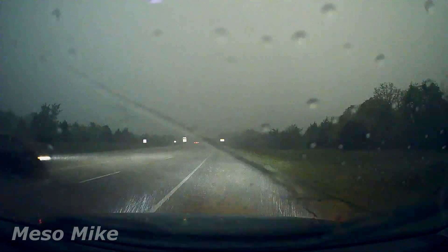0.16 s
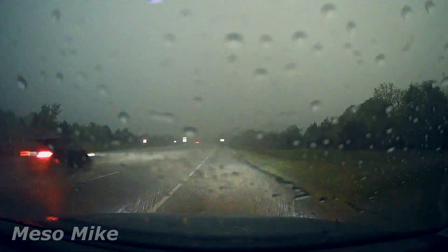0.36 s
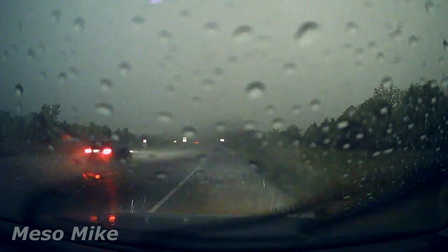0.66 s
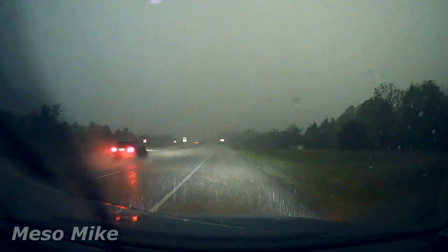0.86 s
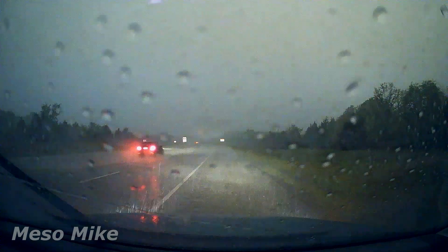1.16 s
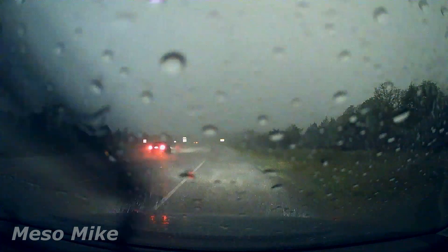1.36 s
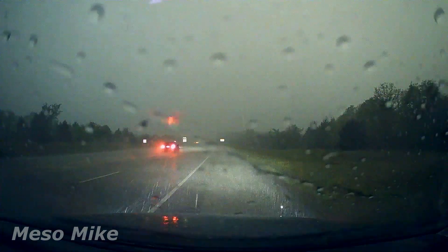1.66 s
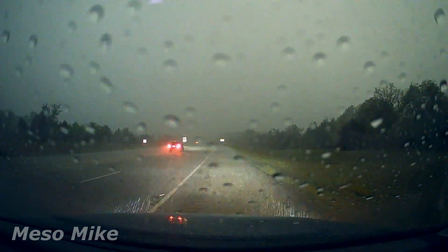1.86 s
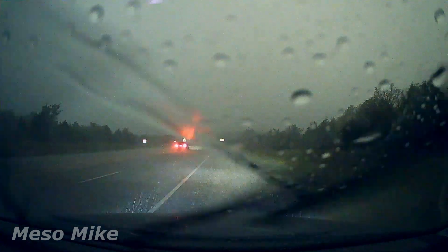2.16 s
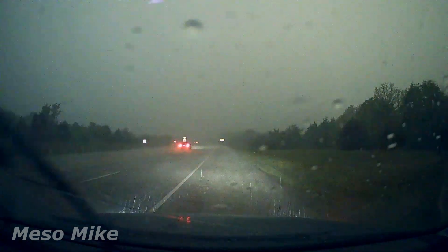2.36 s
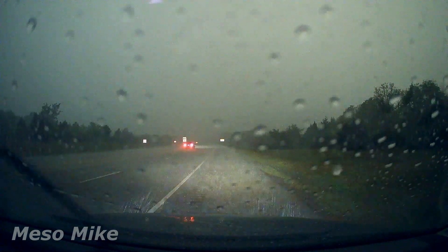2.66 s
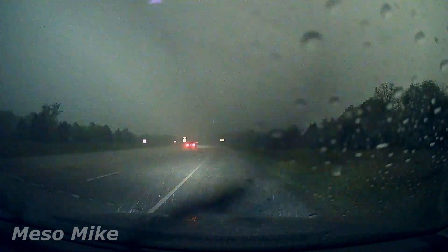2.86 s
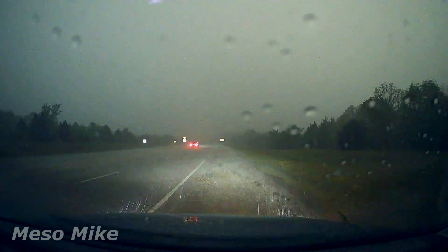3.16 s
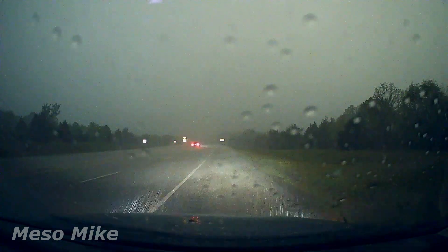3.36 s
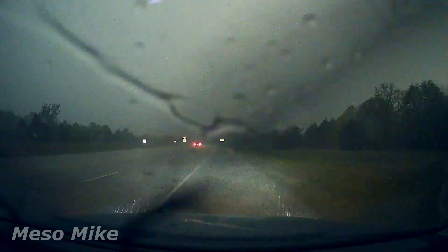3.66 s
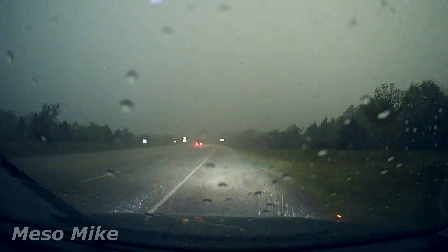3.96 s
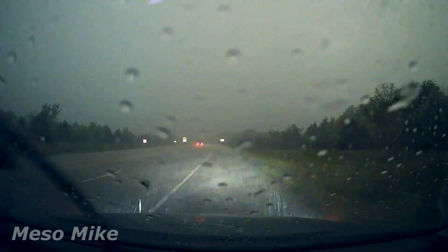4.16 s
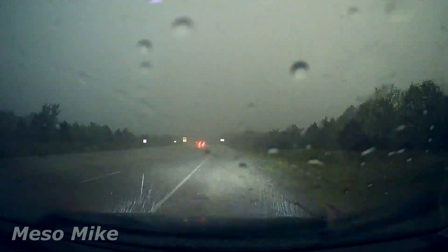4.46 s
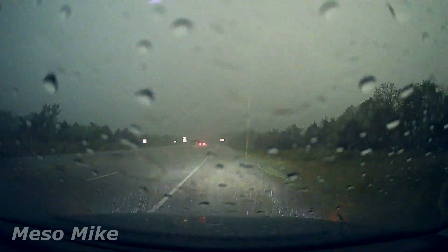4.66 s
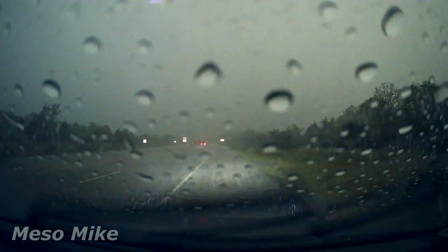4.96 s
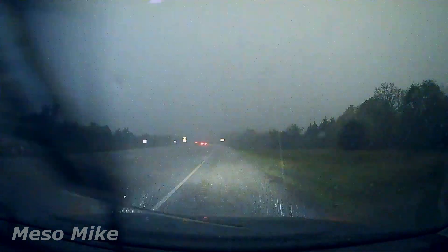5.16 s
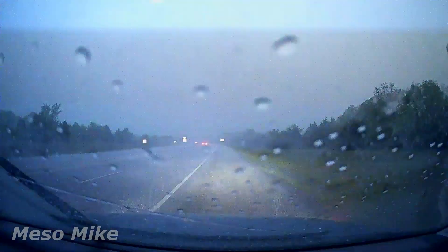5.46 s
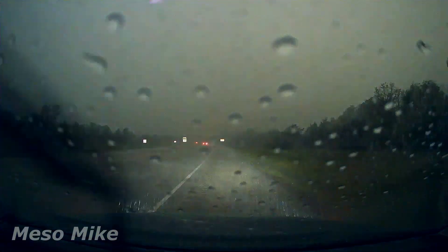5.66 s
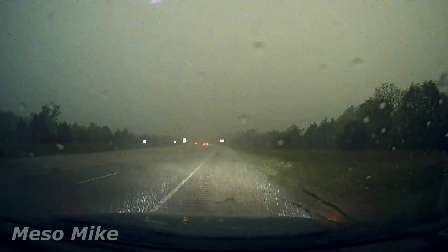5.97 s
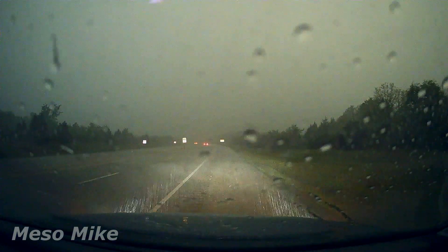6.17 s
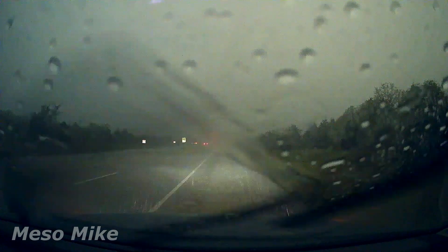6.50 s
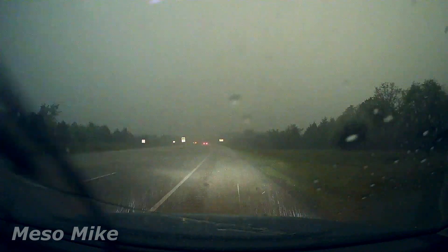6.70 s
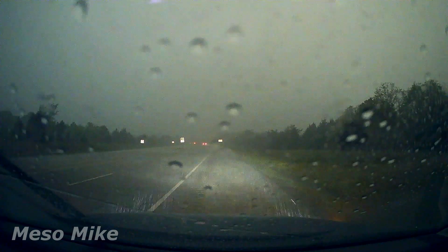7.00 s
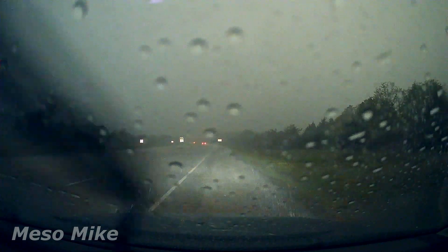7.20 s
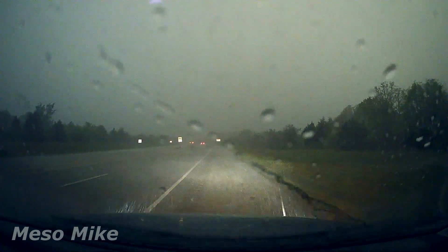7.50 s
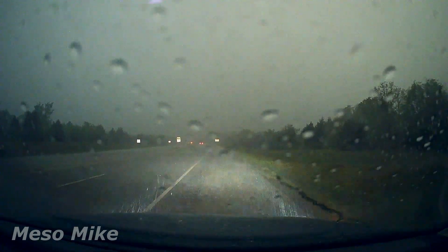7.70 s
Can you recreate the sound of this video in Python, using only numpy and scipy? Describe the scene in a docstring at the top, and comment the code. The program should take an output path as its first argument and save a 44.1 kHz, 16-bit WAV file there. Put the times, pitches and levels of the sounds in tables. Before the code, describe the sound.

Heavy rain drums in gusts on the windshield of a moving car, hard drops cracking over wiper thuds, low engine hum and wet-road rumble.

```python
"""Heavy rain on a moving car, heard close behind the windshield.
Countless drops excite the modes of the windshield glass, in gusts; the hardest cracks overload the microphone.
A low engine hum is a sine at the crank rate with its octave; the wet road and wind rumble as shaped noise.
The wipers thud at each turn (swells of noise through resonances of the body) and throw splats and swishes.
Stray and single drops are blows followed by a decaying burst of spray that keeps the glass ringing."""
import sys
import numpy as np
from scipy import signal
from scipy.fft import rfft, irfft
from scipy.io import wavfile

SR = 44100
rng = np.random.default_rng(int(sys.argv[2]) if len(sys.argv) > 2 else 0)


def waveform_to_disk(signal):
    """Save audio, clipped to [-1, 1], as 16-bit WAV at the path in sys.argv[1]."""
    frames = np.transpose(np.atleast_2d(signal))
    scaled = np.clip(frames, -1, 1) * 32767
    samples = np.round(scaled).astype(np.int16)
    wavfile.write(sys.argv[1], SR, samples)


N = 345744
TIME = np.arange(N) / SR
RING = np.arange(int(.16 * SR)) / SR  # time axis of one ringing drop, s


def undb(db):
    """Logarithmic level: decibels to amplitude gain."""
    return 10 ** (np.asarray(db) / 20)


def unit(x):
    """Energy normalization: scale to an rms of 1."""
    return x / np.sqrt(np.mean(x ** 2))


def curves(table):
    """Linear interpolation: the columns of a table of timed rows, one value a sample."""
    s, *columns = np.transpose(table)
    return [np.interp(TIME, s, column) for column in columns]


def butter(x, hz, kind, order=4):
    """Causal filtering with a maximally flat passband."""
    return signal.sosfilt(signal.butter(order, hz, kind, fs=SR, output="sos"), x)


def noise(gain_at):
    """Spectral shaping: noise of rms 1 whose spectrum follows a function of frequency."""
    hz = np.maximum(np.fft.rfftfreq(N, 1 / SR), 1)
    white = rfft(rng.standard_normal(N))
    return unit(irfft(white * gain_at(hz), N))


def knock_and_tick(x, split_hz=1350, lowest_hz=135):
    """Radiation of a pane, weak in deep bass: its low bending and its bright tick, each at rms 1."""
    audible_bass = butter(x, lowest_hz, "high", order=2)
    knock = butter(audible_bass, split_hz, "low")
    tick = butter(x, split_hz, "high")
    return unit(knock), unit(tick)


# modes of the windshield: pitch_hz [Hz], level_db [dB, relative], t60_s [s, at ring=1]
GLASS_MODES = [(141, -12.5, 0.1), (182.2, -14, 0.12), (301, -6.5, 0.081), (336, -6, .051),
               (444.5, -2, 0.068), (497, -4, 0.036), (549.3, 0.5, 0.066), (640.3, -3, 0.066),
               (719.4, -1, 0.06), (812.6, -3, 0.065), (903, -8, 0.054), (1012, -11.5, 0.03),
               (1121, -16, 0.049), (1650, -15.5, 0.04), (1681, -9, 0.023), (1883, -5.5, 0.05),
               (1963, -6.5, 0.051), (2118, -11.5, 0.077), (2410, -8, 0.04), (2544, -7.5, 0.044),
               (2738, -10, 0.053), (3094, -10.5, 0.07), (3184, -3.5, 0.019), (3384, -10.5, 0.035),
               (3858, -15, 0.066), (3800, -19, 0.0099)]


def pane(detune, ring=1, scatter_db=1.5):
    """Modal superposition: the spot struck sets the strength and sign of every mode of the glass."""
    pitch_hz, level_db, t60_s = np.transpose(GLASS_MODES)[:, :, None]
    shift, side, strength = rng.standard_normal((3, len(GLASS_MODES), 1))
    decay = undb(-60 * RING / (t60_s * ring))
    modes = np.sin(2 * np.pi * pitch_hz * (1 + detune * shift) * RING) * decay
    amplitude = np.sign(side) * undb(level_db + scatter_db * strength)
    return np.sum(amplitude * modes, axis=0)


# strength of the downpour: start_s [s], level_db [dB, patter level before its trim]
GUSTS = [(0.0, -23.5), (0.57, -22.5), (0.89, -21.5), (1.05, -29.5), (1.29, -22.5), (1.48, -22.5),
         (2.38, -29), (3.38, -29.5), (3.84, -21.5), (4.26, -27.5), (4.78, -20.5), (5.0, -27), (5.59, -25.5),
         (6.16, -27.5), (6.33, -25), (6.79, -23.5), (7.05, -28), (7.84, -25.5)]
PATTER_TRIM_DB, PATTER_TICK_DB = 1, -10  # trim of the patter; its tick relative to its knock
BRIGHTEN_DB_PER_DB = 0.08  # heavier rain hits faster, so its tick grows more than its knock


def patter(drops_per_s=1500, spread_db=5.0, clump_db=1.35, clump_hz=10, spots=20):
    """Random impacts on a resonator: clumps of drops strike many spots of glass; gusts move their level."""
    level_db, = curves(GUSTS)
    clumps_db = clump_db * noise(lambda f: np.exp(-(f / clump_hz - 1) ** 2))
    out = np.zeros(N)
    for _ in range(spots):
        lands = rng.random(N) < drops_per_s / spots / SR
        size = undb(clumps_db + spread_db * np.minimum(rng.standard_normal(N), 2))
        out += signal.oaconvolve(lands * size, pane(detune=.042))[:N]
    knock, tick = knock_and_tick(out)
    tick_db = PATTER_TICK_DB + BRIGHTEN_DB_PER_DB * (level_db - level_db.mean())
    return undb(level_db + PATTER_TRIM_DB) * (knock + undb(tick_db) * tick)


# engine: start_s [s], pitch_hz [Hz, crank rate], level_db [dB rms of the hum at that pitch]
ENGINE = [(0, 23.04, -37.5), (4, 23.16, -33.5), (4.25, 25, -30.5), (5.7, 23.8, -27.5), (6.16, 35.2, -35),
          (6.46, 35.3, -27.5), (6.7, 28.7, -39.5), (7.84, 26.5, -35.5)]


def engine(octave_db=-42, waver=0.19):
    """Harmonic radiation of a rotating source: a deep hum at the crank rate with an unsteady octave."""
    pitch_hz, level_db = curves(ENGINE)
    phase = 2 * np.pi * np.cumsum(pitch_hz) / SR
    unsteady = 1 + waver * noise(lambda f: np.exp(-f / 3))
    hum = undb(level_db) * np.sin(phase)
    octave = undb(octave_db) * unsteady * np.sin(2 * phase)
    return np.sqrt(2) * (hum + octave)  # a sine of rms 1 peaks at the root of 2


# road and wind in the cabin: pitch_hz [Hz], level_db [dB per Hz, relative]
ROAD_SPECTRUM = [(16, -11), (36, 7.5), (50, 3), (65, -3), (100, -1.5), (190, -5), (300, 1.5), (600, -6.5),
                 (900, -4.5), (1350, -32.5), (1900, -14.5), (3200, -33.5), (4400, -34.5)]


def road(level_db=-31, swell_db=2.0):
    """Broadband excitation: tyres on wet asphalt and wind make shaped noise, swelling a little."""
    pitch_hz, density_db = np.transpose(ROAD_SPECTRUM)
    rumble = noise(lambda f: undb(np.interp(np.log(f), np.log(pitch_hz), density_db)))
    return rumble * undb(level_db + swell_db * noise(lambda f: np.exp(-f / 4)))


# resonances the wiper linkage shakes: pitch_hz [Hz], width_hz [Hz, at half amplitude],
# level_db [dB, relative]
COWL_MODES = [(51, 16, 1.5), (73, 14, -2), (115, 18, -6.5), (161, 60, -5), (197, 20, -2.5)]
WIPER_FIRST_S, WIPER_SWEEP_S = 0.0039, .724  # the blades turn round at a steady beat
WIPER_FOOT_DB, WIPER_TOP_DB = -26.5, -29  # harder at the foot of the windshield than at the top


def cowl_gain(f):
    """Resonance: a sum of peaks, each falling off with distance from its centre frequency."""
    return sum(undb(level_db) / (1 + (2 * (f - pitch_hz) / width_hz) ** 2)
               for pitch_hz, width_hz, level_db in COWL_MODES)


def wipers(turn_s=.07, count=12):
    """Structure-borne sound: as the blades flip at each turn, the linkage thuds softly into the body."""
    load = 0
    for turn in range(count):
        middle_s = WIPER_FIRST_S + turn * WIPER_SWEEP_S
        level_db = WIPER_TOP_DB if turn % 2 else WIPER_FOOT_DB
        load = load + undb(level_db) * np.exp(-.5 * ((TIME - middle_s) / turn_s) ** 2)
    return load * noise(cowl_gain)


def drop(tick_db, splash_t60_s, splash_share=2.08, ring=0.78, lowest_hz=170, crack_db=6, crack_s=.0025):
    """Impulse response: a sharp blow, then the drop bursts and its spray keeps the glass ringing."""
    spray_decay = np.exp(-np.log(1000) * RING / max(splash_t60_s, .015))
    spray = rng.standard_normal(len(RING)) * spray_decay
    push = splash_share * spray / np.linalg.norm(spray)
    push[0] += 1  # the blow itself
    # so near the microphone the direct crack outweighs the long ring and the lowest modes
    crack = 1 + undb(crack_db) * np.exp(-RING / crack_s)
    struck = crack * signal.fftconvolve(push, pane(detune=0.036, ring=ring))[:len(RING)]
    knock, tick = knock_and_tick(struck, lowest_hz=lowest_hz)
    # the energy of each blow is counted over 10 ms
    return (knock + undb(tick_db) * tick) * np.sqrt(.01 / RING[-1])


def land(drops):
    """Linear superposition: add up drops given as rows of (start_s, level_db, tick_db, splash_t60_s)."""
    out = np.zeros(N + len(RING))
    for start_s, level_db, tick_db, splash_t60_s in drops:
        start = int(start_s * SR)
        out[start:start + len(RING)] += undb(level_db) * drop(tick_db, splash_t60_s)
    return out[:N]


def stray_drops(count=40, over_patter_db=0.5, spread_db=2, tick_db=-3, tick_spread_db=3, splash_t60_s=.055):
    """Random impacts in time: middling drops just stand out of the patter, harder in heavier rain."""
    times = (np.arange(count) + rng.random(count)) / count * TIME[-1]  # one in each equal slice
    size, hardness = rng.standard_normal((count, 2)).T
    level_db = np.interp(times, *np.transpose(GUSTS)) + over_patter_db + spread_db * size
    ticks_db = tick_db + tick_spread_db * hardness
    return land(zip(times, level_db, ticks_db, np.full(count, splash_t60_s)))


# single drops, faint to heavy, and softer splats and swishes of water thrown by the wipers:
# start_s [s], level_db [dB, knock counted over 10 ms], tick_db [dB, relative to knock],
# splash_t60_s [s, decay of the spray, held to at least 0.015]
SINGLE_DROPS = [(.1727, -14.5, -7, 0.029), (.2671, -10, -7, 0.031), (.3209, -14, -13.5, .098),
                (.8578, -6, -3.5, 0.064), (.8705, -6, -4.5, 0.034), (1.0129, -15, -6.5, 0.074),
                (1.0492, -14, 3, 0.046), (1.0699, -12, -17, 0.045), (1.1229, -22, 0.5, 0.048),
                (1.2609, -9.5, -10.5, .04), (1.4171, -11.5, -11.5, 0.17), (1.7039, -14.5, -11.5, 0.13),
                (1.8491, -13.5, -2.5, .06), (1.9937, -17, -10.5, 0.068), (2.6316, -12.5, -5.5, 0.09),
                (2.6693, -17, -1.5, 0.13), (2.728, -12, -10, 0.15), (2.9292, -12.5, -4, 0.033),
                (3.1542, -12, -2, 0.059), (3.2721, -18, -5.5, 0.22), (3.6358, -1, -14.5, 0.081),
                (3.7605, -7.5, -6.5, 0.034), (3.9676, -13, -22, 0.033), (4.0378, -3, -10, 0.082),
                (4.1948, -2.5, -9.5, 0.041), (4.2881, -5.5, -8, 0.073), (4.2997, -3.5, -31, .18),
                (4.3805, -9.5, -14.5, 0.019), (4.4585, -4, -7, 0.063), (5.4401, -12, -8, 0.015),
                (5.6488, -11.5, -26, 0.031), (5.8643, -14.5, -8.5, 0.032), (6.2999, -7, -10, 0.056),
                (6.3335, -16.5, 1, 0.13), (6.7748, -11.5, -24, 0.014), (6.9408, -9, -11.5, 0.03),
                (7.0905, -22.5, 0.5, .03), (7.2283, -9, -11, 0.1), (7.2512, -10.5, -9, 0.076),
                (7.2744, -14.5, -7.5, 0.057), (7.4777, -7, -9, .07), (7.5791, -11, -14.5, .07),
                (7.7294, -30, 13, 0.071)]


def single_drops():
    """Impact excitation: drops, faint to heavy, and splats and swishes of wiper-thrown water hit the glass."""
    return land(SINGLE_DROPS)


def scene():
    """Superposition of all sources as they reach the microphone behind the windshield."""
    return (patter() + engine() + road() + wipers() + stray_drops() + single_drops())[None]


def record(dry):
    """Band limiting and overload: a narrow-band microphone with a trace of hiss clips the hardest drops."""
    ceiling, hiss_db = .71, -97
    narrow = butter(dry, 3700, "low", order=10)
    narrow = signal.sosfilt(signal.ellip(8, .2, 70, 4300, fs=SR, output="sos"), narrow)
    # clipping gives the hardest drops a brief bright edge
    clipped = np.clip(narrow, -ceiling, ceiling) + undb(hiss_db) * rng.standard_normal(N)
    # a dip around 5.5 kHz thins the clipped sound
    dip_band = signal.lfilter(*signal.iirpeak(5500, 2, fs=SR), clipped)
    thinned = clipped - .75 * dip_band
    rounded = butter(thinned, 10000, "low", order=1)
    return signal.sosfilt(signal.ellip(8, .2, 70, 16000, fs=SR, output="sos"), rounded)


dry = scene()
out = record(dry)
waveform_to_disk(out)
```